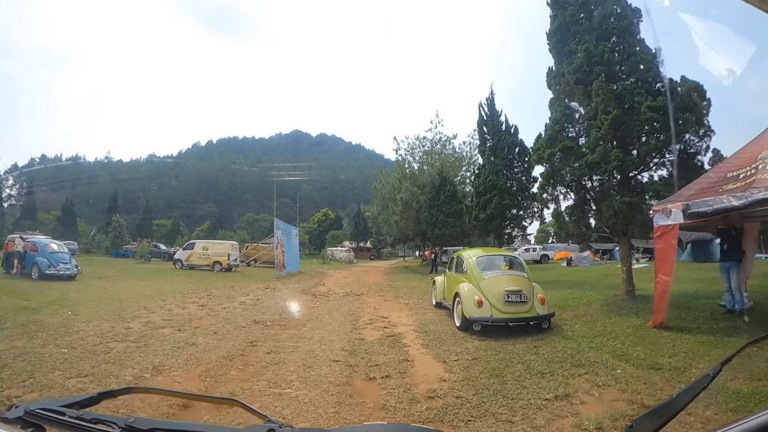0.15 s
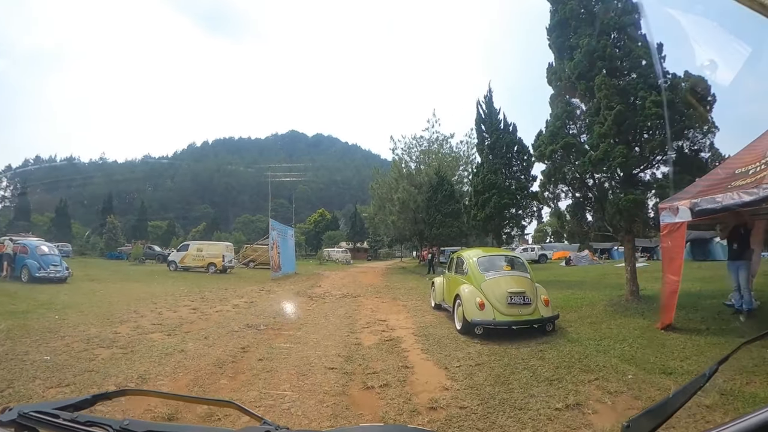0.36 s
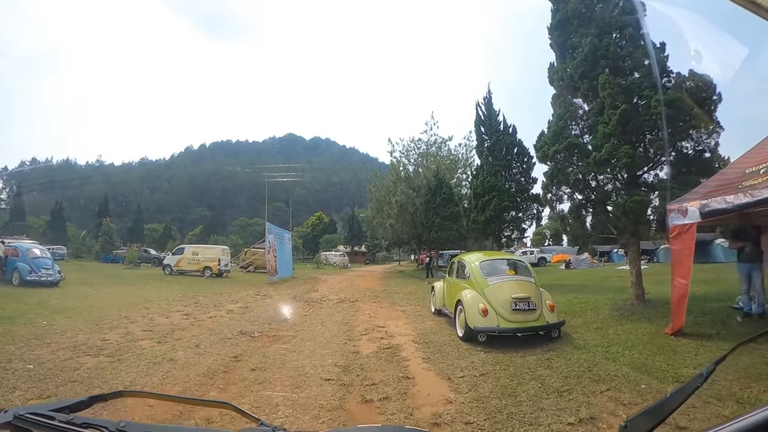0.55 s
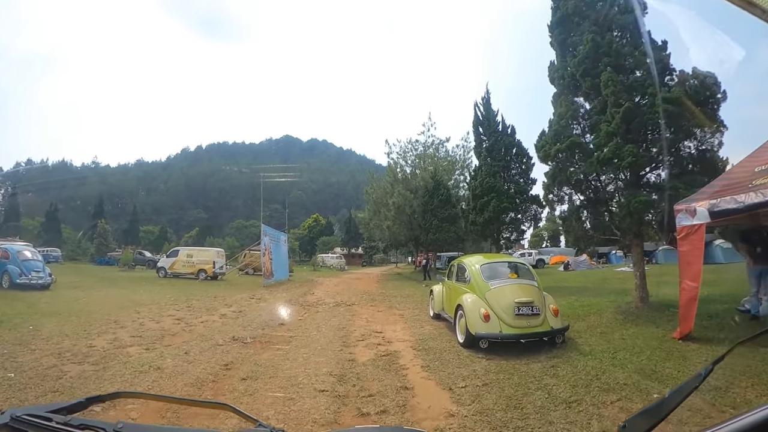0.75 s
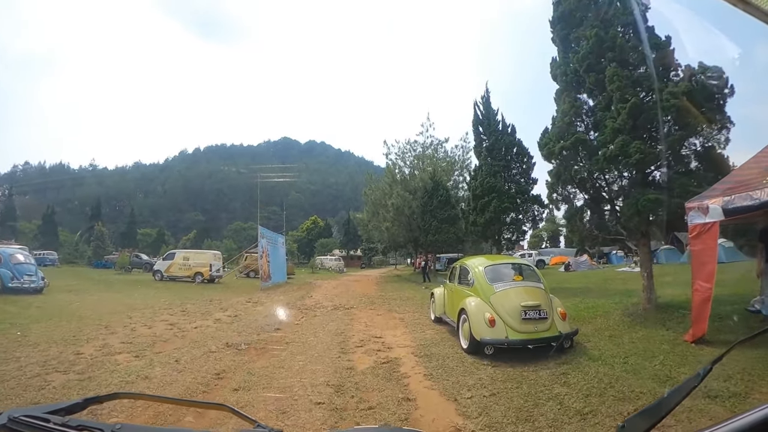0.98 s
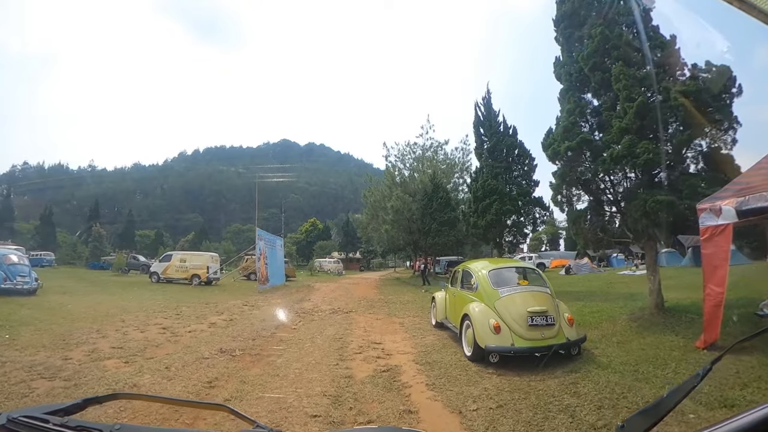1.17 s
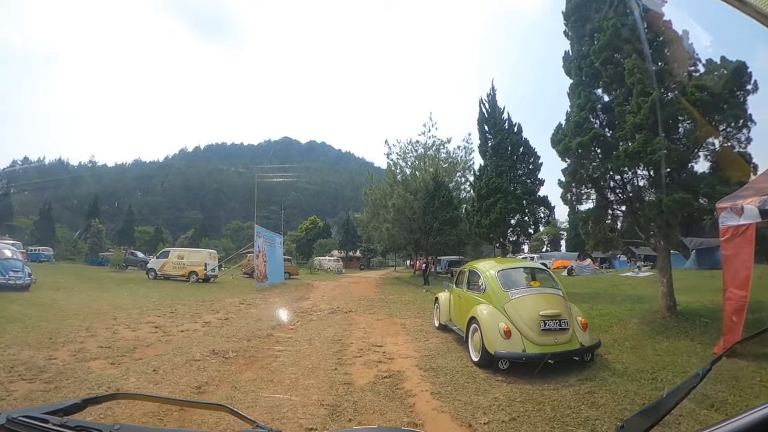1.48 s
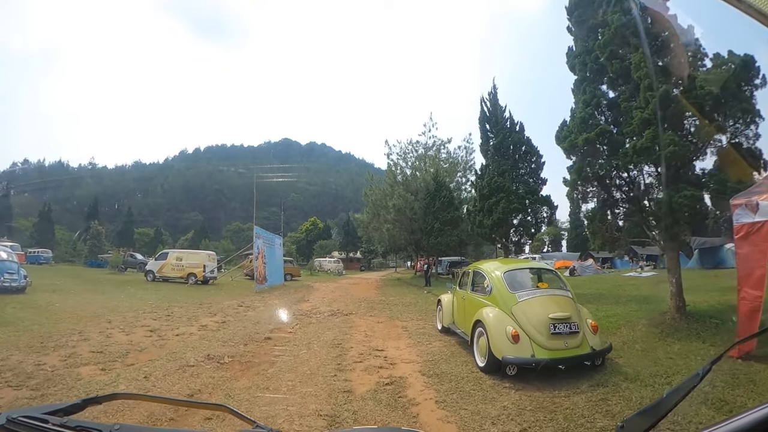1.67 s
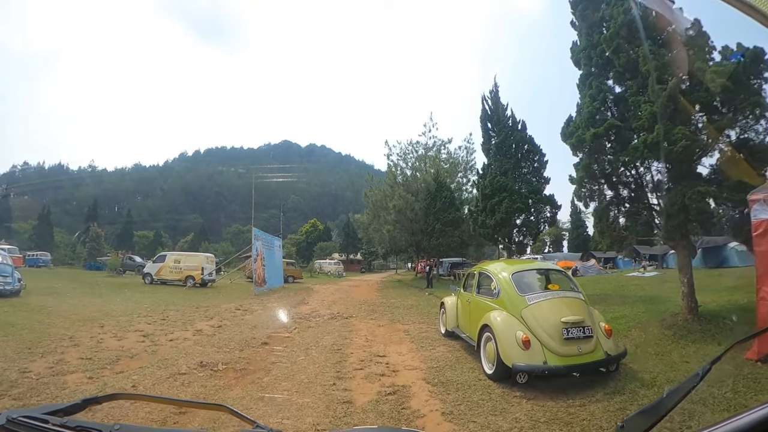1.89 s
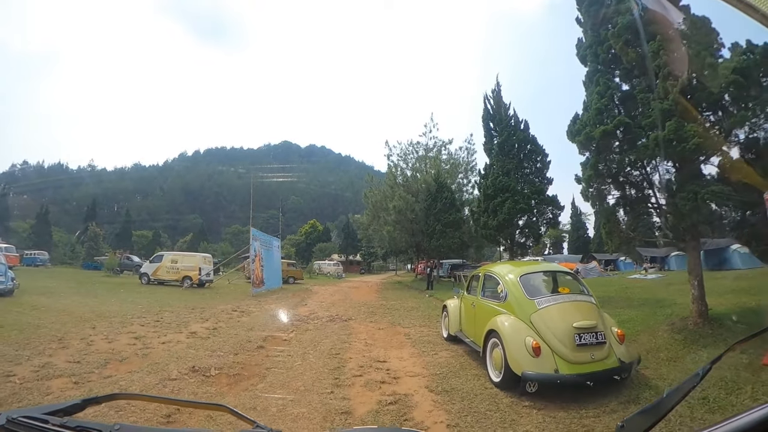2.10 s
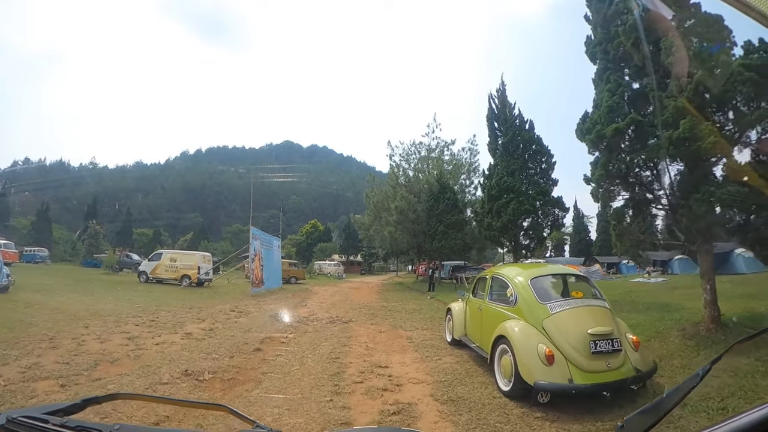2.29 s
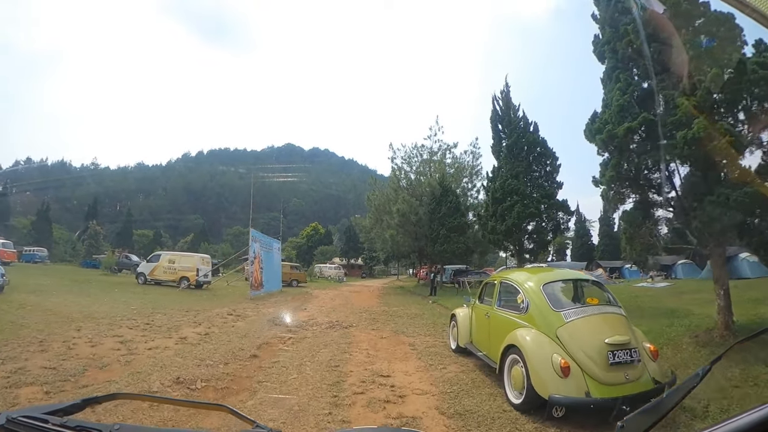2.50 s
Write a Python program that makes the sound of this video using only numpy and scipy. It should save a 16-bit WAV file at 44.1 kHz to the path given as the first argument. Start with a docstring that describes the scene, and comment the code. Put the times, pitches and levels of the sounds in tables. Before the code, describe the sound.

Low engine rumble booms inside an old van's cab, with a few knocks and crunching tyres.

```python
"""The cab of an old air-cooled van booms in three low resonances as it rocks over a rough dirt track.
Heard from inside, the flat-four chugs at the back, each firing an exhaust thump and a puff of clatter.
Underneath, the floor drums and the tyres crunch on soil and clods. Over a bump a brake whistles,
metal squeaks and scrapes, the trim creaks and a loose fixture knocks. A limiter holds the boom down."""
import sys
import numpy as np
from scipy import signal
from scipy.fft import rfft, irfft, next_fast_len
from scipy.io import wavfile
from scipy.ndimage import uniform_filter1d, minimum_filter1d, map_coordinates

SR = 44100
rng = np.random.default_rng(int(sys.argv[2]) if len(sys.argv) > 2 else 0)


def inscribe(sig):
    """Save sig as 16-bit PCM at rate SR to the path in sys.argv[1].

    A 1-D sig is mono; a 2-D sig holds one channel per row.
    Samples are clipped to [-1, 1] before scaling.
    """
    pcm = np.round(np.clip(np.atleast_2d(sig).T, -1, 1) * 32767)
    wavfile.write(sys.argv[1], SR, pcm.astype(np.int16))


N = 116865
T = np.arange(N) / SR

# Ring of the body panels. Each row: centre in Hz, width in Hz, lift in dB.
PANEL_RESONANCES = [(538, 50, 4), (801, 27, 4), (888, 25, 6), (1060, 80, 4), (1426, 35, 5), (1836, 35, 7),
                    (2714, 60, 4), (2922, 50, 5), (3198, 50, 5), (6150, 40, 5)]

# Fader ride of the brake whistle. Each row: time in seconds, level in dB.
WHISTLE_RIDE = [(.13, -99), (.185, -76), (.205, -53.5), (.24, -60), (.265, -51), (.3, -66), (.32, -65),
                (.355, -60), (.375, -99)]
# Partials of the brake whistle and the metal squeak. Each row: pitch in Hz, relative level in dB.
WHISTLE_PARTIALS = [(11912, -3.5), (12103, -8.5)]
SQUEAK_PARTIALS = [(5012, -62), (6142, -51.5), (7278, -64), (8440, -55), (9560, -55), (10650, -61),
                   (11505, -60), (12495, -64), (13345, -68)]
# Metal squeaks. Each row: peak time in seconds, gain in dB, hold in seconds.
SQUEAK_CUES = [(0.013, -7, .01), (0.362, 2, 0.017), (0.573, -14, .015)]
# Trim creaks. Each row: peak time in seconds, level in dB, rise in seconds.
CREAK_CUES = [(.444, -50, 0.0039), (.477, -41.5, 0.01), (0.658, -51, 0.0099)]
# Gritty scrapes. Each row: peak time in seconds, level in dB, rise and 60 dB decay in seconds.
SCRAPE_CUES = [(.363, -44, 0.0021, 0.23), (0.488, -36.5, 0.013, 0.12), (1.049, -53, 0.0022, .05),
               (1.19, -55, 0.0051, 0.065), (1.705, -47, 0.0022, 0.18), (1.856, -45, 0.0068, 0.11),
               (2.085, -52.5, 0.0085, 0.13)]
# Noise colours of creak, scrape and jolt. Each row: frequency in Hz, relative density in dB.
CREAK_EQ = [(700, -19), (1300, 5), (1800, 1.5), (2300, -8), (3500, -14), (6000, -38), (12000, -71)]
SCRAPE_EQ = [(300, -4.5), (900, 13), (1500, 5), (2300, -1.5), (4300, -4), (7800, -3), (10000, -15),
             (12500, -26.5), (15500, -39.5)]
JOLT_EQ = [(90, -7), (150, 18.5), (230, 0), (400, -17), (900, 1), (1450, -14), (1900, -16.5), (3000, -58.5)]

# Fixture knocks. Each row: start in seconds, ring in dB, ring centre in Hz, clack in dB, crack in dB.
KNOCK_CUES = [(0.4004, -40.5, 2930, -69, -46), (0.464, -46.5, 1600, -43, -57),
              (0.5579, -31.5, 2980, -42.5, -38), (0.6965, -53, 2000, -47, -56),
              (0.729, -51, 1890, -48, -52), (0.778, -41, 2620, -44, -69), (0.8071, -38, 2600, -39, -44),
              (0.822, -43, 2680, -52, -62), (0.8751, -41.5, 3600, -52, -39.5)]
# Modes of the loose fixture. Each row: pitch in Hz, relative level in dB.
FIXTURE_MODES = [(1830, 1.5), (2195, -2), (2509, -1), (2729, 2.5), (2940, 2), (3210, 2), (3640, -6.5),
                 (3830, -3.5), (4140, -6), (4895, -2), (5432, -2.5), (5841, -10), (7830, -2.5)]
# Its hollow clack and bright crack. Each row: frequency in Hz, relative density in dB.
CLACK_EQ = [(300, -7.5), (900, -6.5), (1400, -8.5), (1800, 0.5), (2300, -5), (4000, -39), (12000, -76)]
CRACK_EQ = [(1500, -27), (3600, 12), (5200, 0.5), (7800, -1), (10000, -14.5), (13000, -29.5), (15500, -43)]

# Crushed clods. Each row: peak time in seconds, then thump, crunch and grit levels in dB.
CLOD_CUES = [(0.025, -39, -44, -53), (.05, -48, -53, -48), (0.074, -51, -61, -56), (.117, -53, -49, -48),
             (0.373, -37, -49, -56), (.715, -44, -45.5, -58), (.826, -48, -43, -60), (0.896, -41, -58, -60),
             (1.01, -48, -48, -66), (1.118, -44, -54, -58), (1.138, -56, -52, -54), (1.16, -60, -51, -51.5),
             (1.18, -58, -56, -53), (1.21, -53, -48, -58), (1.265, -44, -49.5, -57),
             (1.539, -54, -50.5, -63), (1.629, -46, -50, -63), (1.668, -45, -44.5, -60),
             (1.708, -39.5, -53, -63), (1.866, -40.5, -56, -64), (1.907, -54, -48.5, -59),
             (1.933, -45, -54, -62), (2.068, -45, -58, -59), (2.135, -48, -53, -59.5),
             (2.208, -44, -52.5, -62), (2.27, -55, -47, -65), (2.424, -55, -55, -65)]
# One colour each for thump, crunch and grit. Each row: frequency in Hz, relative density in dB.
CLOD_EQS = [
    [(130, -25.5), (230, 4.5), (330, -6.5), (600, -15.5), (1200, -31.5), (4000, -80)],
    [(450, -17.5), (850, -7), (1100, 4), (1450, -2), (2000, -15.5), (5000, -39.5), (12000, -72)],
    [(1200, -20.5), (2100, 2.5), (3100, -6.5), (4200, -14), (7800, -18.5), (10000, -33), (15000, -62.5)],
]
# Fader rides of the tyres' crunch and dull roll. Each row: time in seconds, relative level in dB.
CRUNCH_RIDE = [(0, -46.5), (.07, -42), (.16, -48.5), (.24, -54.5), (.33, -52), (.42, -50.5), (.6, -51),
               (.66, -55), (.74, -50), (.84, -46.5), (.93, -52.5), (1.08, -52), (1.18, -47.5),
               (1.26, -50.5), (1.32, -54.5), (1.42, -52), (1.58, -52), (1.7, -50.5), (1.79, -50.5),
               (1.86, -49), (2.0, -52.5), (2.1, -52), (2.24, -53), (2.42, -50.5), (2.52, -56), (2.6, -47),
               (2.65, -51)]
ROLL_RIDE = [(.04, -37), (.18, -45), (.28, -54.5), (.37, -43.5), (.44, -67), (.6, -66), (.66, -44.5),
             (.76, -54), (.84, -49), (.94, -50), (1.02, -53), (1.17, -42.5), (1.33, -50), (1.42, -47.5),
             (1.55, -50), (1.68, -49), (1.8, -57), (1.88, -49.5), (2.04, -50.5), (2.22, -44), (2.52, -55.5),
             (2.65, -46)]
# Stones ticking under the body. Each row: peak time in seconds, level in dB.
STONE_CUES = [(.274, -55), (1.473, -48.5), (1.541, -54), (1.636, -54), (1.706, -52), (1.859, -50.5),
              (1.93, -52.5), (2.199, -51)]
# Noise colours of soil, roll and stones. Each row: frequency in Hz, relative density in dB.
SOIL_EQ = [(150, -18.5), (500, -5), (1100, -0.5), (1900, -4.5), (2900, -8), (4200, -12), (7800, -14),
           (9500, -26.5), (12000, -40.5), (15000, -64.5)]
ROLL_EQ = [(200, -17), (400, 0.5), (600, 4), (1100, -1.5), (1450, -8.5), (2000, -25), (4000, -42.5),
           (10000, -100)]
STONE_EQ = [(800, -2.5), (2000, 2.5), (3300, -1), (4500, -13), (6100, 1.5), (7600, -5), (9500, -25),
            (14000, -55)]

# Punch of the four cylinders. Each entry: relative level in dB.
CYLINDER_ACCENTS = [-1, -7.5, -1, -4]
# Exhaust heard through the body. Each row: frequency in Hz, relative gain in dB.
EXHAUST_EQ = [(40, -14.5), (85, -3), (110, 0.5), (145, -1.5), (190, -15), (230, -7), (330, -20),
              (500, -30.5), (900, -36.5), (3000, -82), (9000, -140)]
# Valve gear and cooling fan behind the bulkhead. Each row: frequency in Hz, relative density in dB.
MACHINERY_EQ = [(120, -19), (200, 8), (272, 2.5), (344, -15), (405, -3.5), (659, -11.5), (1050, -23),
                (1150, -20.5), (1360, -13), (1750, -25.5), (4470, -32.5), (7150, -38.5), (8260, -58.5),
                (13000, -71.5), (15000, -66.5)]
# Brief dips in the chug. Each row: centre in seconds, depth on the cab layer in dB.
DIP_CUES = [(0.288, 4), (.565, 0), (.68, 1.5), (.987, 2.5), (1.098, 5), (1.32, 11), (1.444, 2.5),
            (1.563, 1.5), (1.686, 4.5), (1.787, 7.5), (2.108, 4), (2.54, 1)]

# Floor pan thuds over ruts. Each row: peak time in seconds, level in dB, pitch in Hz.
THUD_CUES = [(.035, -28, 120.7), (0.495, -29.5, 146), (0.673, -33.5, 154.8), (1.565, -34, 145),
             (1.661, -33, 158.1), (2.254, -30.5, 133.2), (2.345, -32.5, 112.1)]
# Noise colours of the floor pan and cab rumble. Each row: frequency in Hz, relative density in dB.
FLOOR_EQ = [(40, -91), (72, -34), (101, -7.5), (126, 12.5), (147, 9.5), (186, 1.5), (226, -3), (291, -1.5),
            (401, -9.5), (800, -73.5), (3000, -120)]
RUMBLE_EQ = [(20, -26), (36, -9.5), (65, -1), (85, 0), (110, -33), (400, -120)]
# Fader rides of floor, body shudder and both cab booms. Each row: time in seconds, relative level in dB.
FLOOR_RIDE = [(.05, -28), (.3, -40), (.42, -40.5), (.49, -33), (.58, -41), (.78, -34), (.87, -36),
              (.94, -37), (1.1, -39.5), (1.3, -31.5), (1.46, -41), (1.7, -36.5), (1.88, -37), (2.08, -37),
              (2.22, -35), (2.42, -39.5), (2.65, -40)]
SHUDDER_RIDE = [(0.03, -12), (0.27, -28.5), (0.33, -15), (0.53, -24), (1.23, -19.5), (1.38, -24.5),
                (1.5, -17.5), (2.01, -27), (2.06, -12.5), (2.19, -18.5), (2.24, -34), (2.31, -17.5),
                (2.48, -23.5), (2.62, -18)]
UPPER_BOOM_RIDE = [(0.03, -17.5), (0.39, -39.5), (0.59, -18), (0.65, -27.5), (0.77, -14), (1.05, -21.5),
                   (1.28, -22), (1.31, -29), (1.66, -22.5), (1.72, -37), (1.77, -23), (1.98, -14.5),
                   (2.03, -24.5), (2.14, -20), (2.23, -25), (2.45, -36), (2.48, -16.5), (2.62, -31)]
MAIN_BOOM_RIDE = [(0.03, -11), (0.09, -14), (0.35, -23.5), (0.5, -16.5), (0.6, -29.5), (0.65, -18.5),
                  (0.68, -30), (0.86, -15.5), (0.97, -29), (1.0, -19.5), (1.15, -16.5), (1.33, -23.5),
                  (1.36, -16.5), (1.46, -15.5), (1.54, -31.5), (1.79, -13.5), (1.96, -29), (1.99, -16.5),
                  (2.07, -23.5), (2.14, -29.5), (2.21, -20.5), (2.4, -14), (2.45, -20), (2.62, -21)]
# Pitch bends of the two cab booms. Each row: time in seconds, pitch in Hz.
UPPER_BOOM_BEND = [(0, 75.9), (.3, 72.68), (.57, 69.27), (.85, 69.99), (1.05, 67.8), (1.27, 72.76),
                   (1.65, 71.82), (1.92, 65.08), (2.12, 69.41), (2.5, 66.28)]
MAIN_BOOM_BEND = [(0, 49.93), (.15, 50.67), (.5, 49.57), (.84, 51.89), (.93, 57.4), (1.02, 50.02),
                  (1.2, 52.31), (1.87, 51.67), (2.05, 52.08), (2.3, 50.5), (2.45, 52.44), (2.65, 50.08)]

KNOCK_RISE_S, KNOCK_T60_S, CONTACT_S, RING_SPREAD_OCT = .0018, .028, .0003, .7
REBOUND_S, REBOUND_DB, CAB_TAIL_DB, CAB_T60_S = .004, -8, -15, .11
FIRING_HZ, SPEED_DRIFT = 51.83, .03  # drift is a fraction of the firing rate
SCATTER_DB, JITTER_S = 1.5, 0.00059  # from firing to firing
THROB_DB, CLATTER_DB, PUFF_T60_S = -42.5, -48.5, 0.055
DIP_WIDTH_S, DIP_SHARE = 0.011, 0.33  # engine and tyres take this share of each dip
CEILING_DB, LIMITER_HOLD_S, TOP_HZ = -8.8, .02, 14700


def amp(db):
    """Decibels to gain."""
    return 10 ** (np.asarray(db) / 20)


def unit(x):
    """Scale to rms 1."""
    return x / np.sqrt(np.mean(x ** 2) + 1e-20)


def curve(rows):
    """An automation lane: (seconds, value) rows joined by straight lines."""
    return np.interp(T, *np.transpose(rows))


def wobble(rate):
    """A smooth random modulator, rate knots a second."""
    return map_coordinates(rng.standard_normal(4096), [T * rate + 2], mode="wrap")


def coloured(x, eq, resonances=()):
    """x through a (Hz, dB) EQ curve with resonant peaks on top, at rms 1."""
    size = next_fast_len(N + SR // 2)
    hz = np.fft.rfftfreq(size, 1 / SR)
    eq_hz, eq_db = np.transpose(eq)
    curve_db = np.interp(np.log(hz + 1), np.log(eq_hz), eq_db)
    lift_db = sum(db / (1 + (2 * (hz - centre) / width) ** 2) for centre, width, db in resonances)
    return unit(irfft(rfft(x, size) * amp(curve_db + lift_db), size)[:N])


def noise():
    """White noise."""
    return rng.standard_normal(N)


def grains(rough_db, rate):
    """Noise roughened by a fast random flutter in level."""
    return noise() * amp(rough_db * wobble(rate))


def tone(hz, wander_hz, rate):
    """A sine of rms 1 whose pitch wanders."""
    cycles = rng.random() + np.cumsum(hz + wander_hz * wobble(rate)) / SR
    return np.sqrt(2) * np.sin(2 * np.pi * cycles)


def swell(s, rise, t60, hold=0):
    """An envelope that rises to 1 at time s, holds and dies away; all times in seconds."""
    return np.exp(-(np.minimum(T - s, 0) / rise) ** 2) * amp(-60 * np.maximum(T - s - hold, 0) / t60)


def brake_whistle():
    """The brake sings on two thin, close partials."""
    pair = sum(amp(db) * tone(hz, wander_hz=15, rate=200) for hz, db in WHISTLE_PARTIALS)
    return amp(curve(WHISTLE_RIDE)) * pair


def squeaks():
    """Metal squeaks in short bursts, each partial rough in level and pitch."""
    partials = sum(amp(db) * unit(amp(3.5 * wobble(250)) * tone(hz, wander_hz=124, rate=1200))
                   for hz, db in SQUEAK_PARTIALS)
    return partials * sum(amp(db) * swell(s, rise=0.004, t60=0.18, hold=hold) for s, db, hold in SQUEAK_CUES)


def creaks():
    """The trim sticks and slips as the body twists."""
    envelope = sum(amp(db) * swell(s, rise, t60=0.12) for s, db, rise in CREAK_CUES)
    return envelope * coloured(grains(rough_db=1.9, rate=550), CREAK_EQ, PANEL_RESONANCES)


def scrapes():
    """Short gritty scrapes ring the fixture's modes."""
    envelope = sum(amp(db) * swell(s, rise, t60) for s, db, rise, t60 in SCRAPE_CUES)
    ringing = [(hz, 70, 9) for hz, _ in FIXTURE_MODES]  # 70 Hz wide, 9 dB high
    return envelope * coloured(grains(rough_db=1.4, rate=700), SCRAPE_EQ, ringing)


def jolt():
    """The body takes the bump with one dull burst of noise."""
    return amp(-42) * swell(0.474, rise=0.02, t60=0.32) * coloured(noise(), JOLT_EQ, PANEL_RESONANCES)


def knocks():
    """The loose fixture strikes and rebounds, ringing its modes and leaving a short tail in the cab."""
    mode_hz, mode_db = np.transpose(FIXTURE_MODES)
    modes = np.array([tone(hz, wander_hz=45.7, rate=500) for hz in mode_hz])
    clack = coloured(noise(), CLACK_EQ, PANEL_RESONANCES)
    crack = coloured(noise(), CRACK_EQ, PANEL_RESONANCES)
    out = np.zeros(N)
    for s, ring_db, centre_hz, clack_db, crack_db in KNOCK_CUES:
        peak = s + KNOCK_RISE_S
        blow = swell(peak, KNOCK_RISE_S, KNOCK_T60_S)
        rebound = amp(REBOUND_DB) * swell(peak + REBOUND_S, KNOCK_RISE_S / 2, KNOCK_T60_S)
        tail = amp(CAB_TAIL_DB) * swell(peak, KNOCK_RISE_S, CAB_T60_S)
        envelope = (blow + rebound + tail) * np.clip((T - s) / CONTACT_S, 0, 1)
        off_centre = np.log2(mode_hz / centre_hz) / RING_SPREAD_OCT
        ring = unit((amp(mode_db) / (1 + off_centre ** 2)) @ modes)
        out += envelope * (amp(ring_db) * ring + amp(clack_db) * clack + amp(crack_db) * crack)
    return out


def clods():
    """A clod gives way under a tyre: a dull thump, a crunch and a spray of grit."""
    out = np.zeros(N)
    for layer, eq in enumerate(CLOD_EQS):
        envelope = sum(amp(db[layer]) * swell(s, rise=.0028, t60=0.088) for s, *db in CLOD_CUES)
        out += envelope * coloured(grains(rough_db=1.9, rate=500), eq, PANEL_RESONANCES)
    return out


def tyres():
    """A bed of dull roll and crushed soil, with a few flicked stones pinging on metal."""
    soil = grains(rough_db=1.5, rate=400)
    crunch = amp(curve(CRUNCH_RIDE) - 3.5) * coloured(soil, SOIL_EQ, PANEL_RESONANCES)
    roll = amp(curve(ROLL_RIDE) - 4.0) * coloured(noise(), ROLL_EQ, PANEL_RESONANCES)
    tick = coloured(noise(), STONE_EQ, PANEL_RESONANCES)
    ping = amp(-6.5) * tone(hz=6150, wander_hz=60.6, rate=600)
    strikes = sum(amp(db) * swell(s, rise=0.00073, t60=0.036) for s, db in STONE_CUES)
    return crunch + roll + strikes * (tick + ping)


def engine():
    """Each firing thumps the exhaust and throws a puff of clatter over the steady fan."""
    firing_count = np.cumsum(FIRING_HZ * (1 + SPEED_DRIFT * wobble(4))) / SR
    count = int(firing_count[-1])
    jitter, scatter = rng.standard_normal((256, 2))[:count].T
    times = np.interp(np.arange(count), firing_count, T) + JITTER_S * jitter
    sizes = amp(np.resize(CYLINDER_ACCENTS, count) + SCATTER_DB * scatter)
    firings = np.bincount(np.clip(times * SR, 0, N - 1).astype(int), sizes, N)
    puffs = unit(signal.fftconvolve(firings, amp(-60 * T / PUFF_T60_S))[:N])
    clatter = coloured(noise() * (1 + puffs), MACHINERY_EQ, PANEL_RESONANCES)  # the 1 is the fan
    clatter *= amp(1.88 * wobble(13))
    return amp(THROB_DB) * coloured(firings, EXHAUST_EQ) + amp(CLATTER_DB) * clatter


def cab():
    """Three low resonances swell and sink as the body rocks; the floor drums and thuds."""
    boom = amp(curve(MAIN_BOOM_RIDE) + 2.14) * tone(curve(MAIN_BOOM_BEND), wander_hz=1.144, rate=12)
    upper = amp(curve(UPPER_BOOM_RIDE) - 2.44) * tone(curve(UPPER_BOOM_BEND), wander_hz=1.8, rate=16)
    shudder = amp(curve(SHUDDER_RIDE) - 1.66) * tone(hz=24.2, wander_hz=3, rate=18)
    rumble = amp(-32.5) * coloured(noise(), RUMBLE_EQ)
    drumming = amp(curve(FLOOR_RIDE) - 3.0) * coloured(noise(), FLOOR_EQ)
    thuds = sum(amp(db) * swell(s, rise=0.0089, t60=0.28) * tone(hz, wander_hz=6.74, rate=35)
                for s, db, hz in THUD_CUES)
    return boom + upper + shudder + rumble + drumming + thuds


def scene():
    """The mono mix at the windscreen; the cab dips briefly on cue, engine and tyres less so."""
    dip_db = sum(db * np.exp(-((T - s) / DIP_WIDTH_S) ** 2) for s, db in DIP_CUES)
    running = amp(-dip_db) * cab() + amp(-DIP_SHARE * dip_db) * (engine() + tyres())
    return (running + clods() + knocks() + scrapes() + jolt() + creaks() + brake_whistle() + squeaks())[None]


def record(dry):
    """A look-ahead limiter holds the boom down, then a steep low-pass trims the top."""
    hold = int(LIMITER_HOLD_S * SR)
    needed = np.minimum(1, amp(CEILING_DB) / (np.abs(dry[0]) + 1e-9))
    held = minimum_filter1d(needed, hold)
    gain = uniform_filter1d(uniform_filter1d(held, hold), hold // 2)
    low_pass = signal.butter(20, TOP_HZ, fs=SR, output="sos")
    return signal.sosfiltfilt(low_pass, dry[0] * gain)[None]


dry = scene()
out = record(dry)
inscribe(out)
```